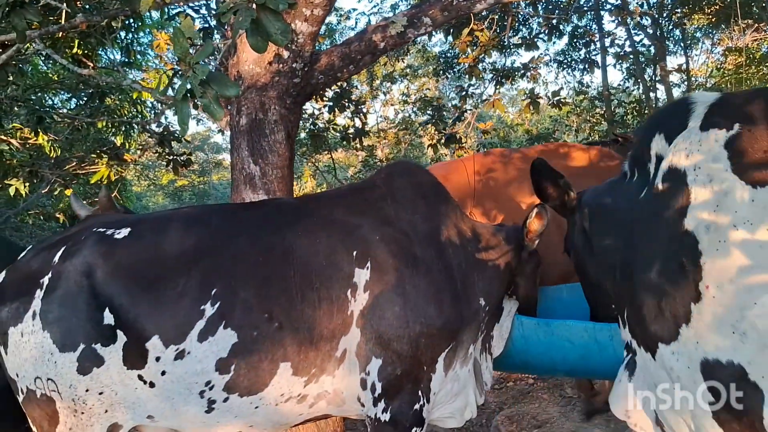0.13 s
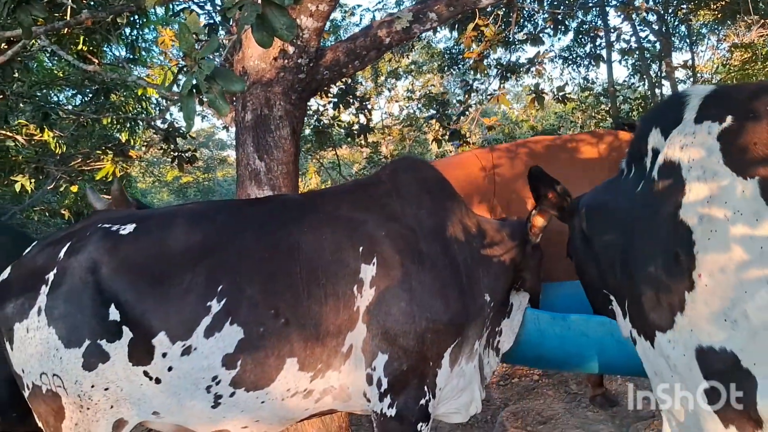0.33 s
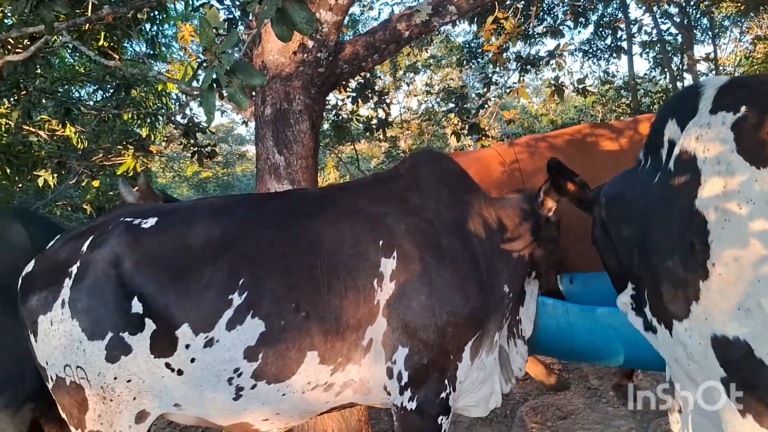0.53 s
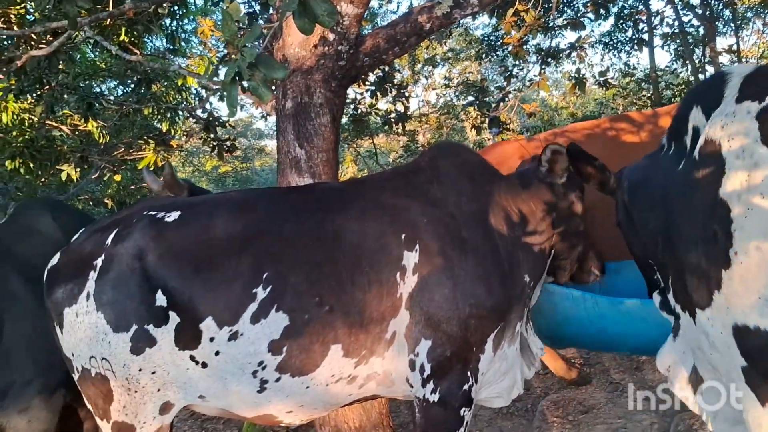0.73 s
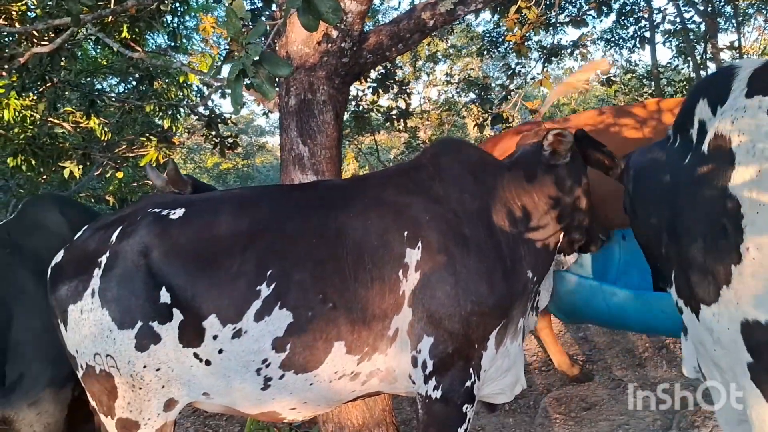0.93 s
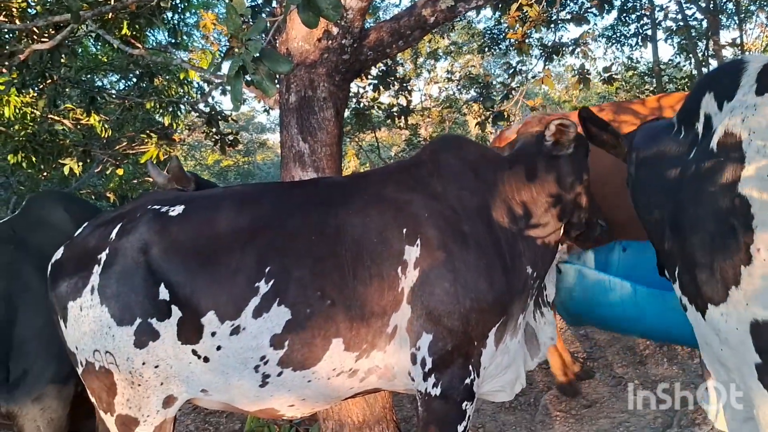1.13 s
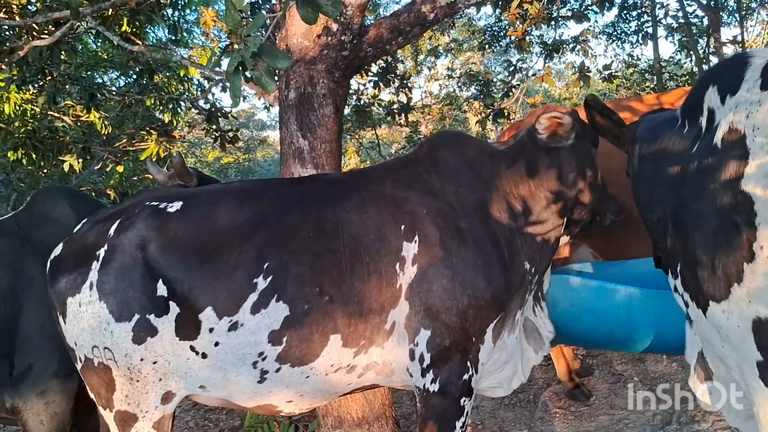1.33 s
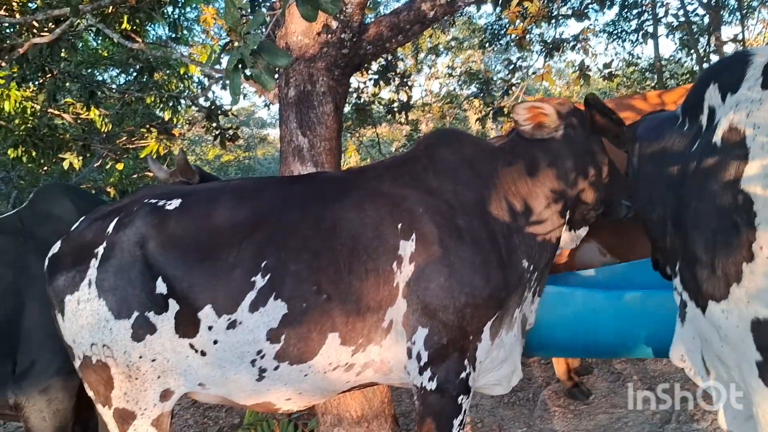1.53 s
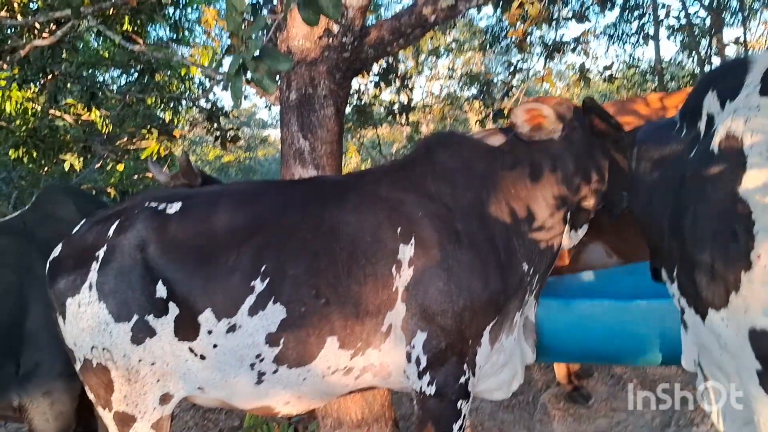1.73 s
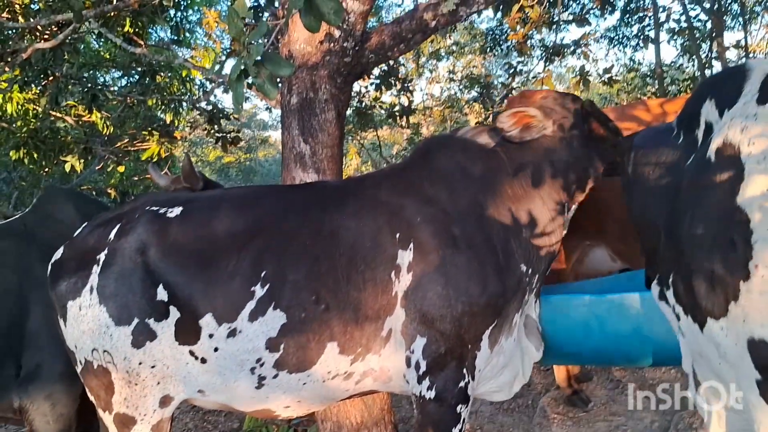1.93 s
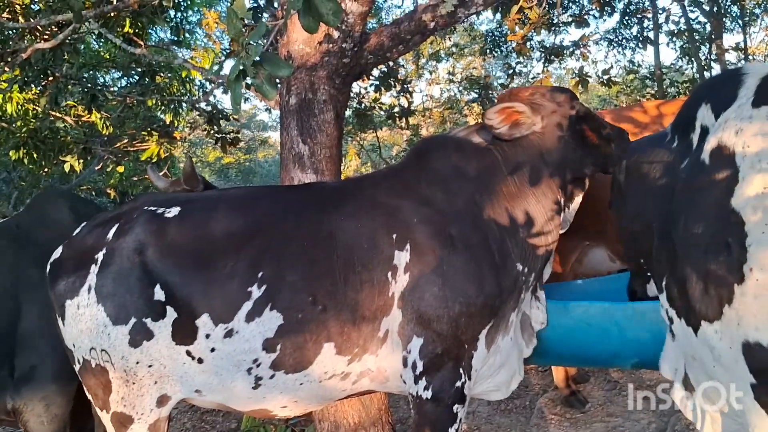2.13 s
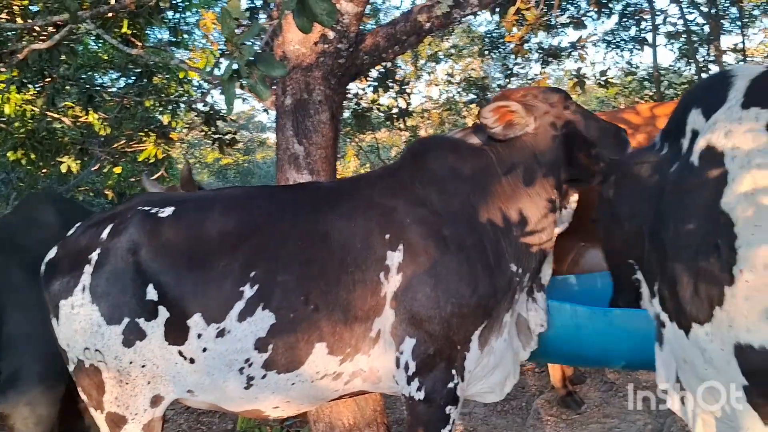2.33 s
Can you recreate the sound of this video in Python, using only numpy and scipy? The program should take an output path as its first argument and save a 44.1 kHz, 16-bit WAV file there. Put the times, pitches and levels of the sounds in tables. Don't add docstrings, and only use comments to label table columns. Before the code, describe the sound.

Cattle bump a hollow plastic trough in uneven clusters, tongues ticking and salt crunching, faint birds behind

```python
import sys
import numpy as np
from scipy import signal
from scipy.fft import rfft, irfft, next_fast_len
from scipy.io import wavfile

SR = 44100
rng = np.random.default_rng(int(sys.argv[2]) if len(sys.argv) > 2 else 0)


def to_wav(s):
    ch = np.atleast_2d(s).T
    pcm = np.round(np.clip(ch, -1, 1) * 32767)
    wavfile.write(sys.argv[1], SR, pcm.astype(np.int16))


def invert_db(x):
    u = np.asarray(x, float) / 20
    return 10 ** u


N = 103635


def at_hz(points, hz):
    point_hz, value = np.transpose(points)
    return np.interp(np.log(hz), np.log(point_hz), value)


def rms_one(x):
    return x / np.sqrt(np.mean(x ** 2) + 1e-20)


def drift(rate_hz):
    r = np.exp(-80 * np.pi * rate_hz / SR)
    noise = rng.standard_normal(N // 40 + 2002)
    slow = signal.lfilter([1], [1, -2 * r, r * r], noise)[2000:]
    return np.interp(np.arange(N) / 40, np.arange(len(slow)), rms_one(slow))


def ring(clicks, hz, t60_s):
    r = invert_db(-60 / (t60_s * SR))
    w = 2 * np.pi * hz / SR
    return signal.lfilter([0, np.sin(w)], [1, -2 * r * np.cos(w), r * r], clicks + 1e-18)


def grains(per_s, spread_db):
    sizes = invert_db(spread_db * np.minimum(rng.exponential(1, N), 4)) * rng.choice([-1, 1], N)
    return sizes * (rng.random(N) < per_s / SR)


def gritty(per_s, grain_db):
    sources = []
    for _ in range(2):
        hiss = rng.standard_normal((2, N))
        clicks = invert_db(grain_db) * rms_one(grains(per_s, spread_db=4.5))
        sources.append(hiss + clicks * rng.choice([-1, 1], (2, N)))
    return sources


def coloured(sources, spectrum, tilt, patchy_db):
    out = 0
    edges = 25 * 2 ** np.arange(0, 9.6, .5)
    for k, (low, high) in enumerate(zip(edges, edges[1:])):
        hz = np.sqrt(low * high)
        if hz > spectrum[0][0] * .7:
            bandpass = signal.butter(2, [low, high], "band", fs=SR, output="sos")
            band = signal.sosfilt(bandpass, sources[k % 2])
            level_db = at_hz(spectrum, hz) + tilt * np.log2(hz / 4000) + patchy_db * drift(14.7)
            out = out + band * invert_db(level_db)
    return out


def stroke(start_s, length_s, attack_s=0.0068):
    release_s = 0.026
    t = np.arange(N) / SR - start_s
    return np.clip(t / attack_s, 0, 1) * np.exp(-np.maximum(t - length_s, 0) / release_s)


# pitch_hz, level_db [dB], t60_s [s]
BARREL_MODES = [(101.4, -17, 0.63), (144.9, -7, 0.17), (195, -10, 0.21), (250, -6, 0.17),
                (288.7, -14.5, .15), (350, -0.5, 0.077), (431, -11, 0.19), (493.5, 1, 0.085),
                (633, -0.5, 0.048), (787, 2, 0.043), (953, 1.5, 0.021), (1070, 2, 0.013), (1540, -9, 0.054),
                (2490, -20, 0.037)]
# start_s [s], peak_db [dB], pitch_hz (favoured) [Hz], rattle_s [s]
BUMPS = [(0.053, -34.5, 960, 0.0085), (0.192, -33, 205, 0.0088), (0.279, -27.5, 1190, 0.0091),
         (0.294, -29, 1300, 0.0046), (0.313, -26, 1200, 0.0043), (.329, -19.5, 860, 0.0069),
         (0.356, -16, 380, 0.011), (0.368, -19.5, 350, 0.019), (0.51, -56.5, 1500, 0.017),
         (0.723, -31, 304, 0.01), (0.806, -30, 830, 0.011), (.848, -23, 560, 0.0075),
         (0.85, -29, 1910, 0.016), (0.97, -30, 660, 0.027), (1.044, -25.5, 1940, 0.012),
         (1.103, -16.5, 1660, 0.0051), (1.213, -29, 350, 0.018), (1.242, -33, 1520, 0.017),
         (1.293, -30, 1510, 0.0056), (1.54, -40, 2120, 0.0084), (2.003, -20.5, 430, 0.009)]


def knocks():
    out = 0
    luck = rng.standard_normal((len(BARREL_MODES), len(BUMPS)))
    for (mode_hz, mode_db, t60_s), lucks in zip(BARREL_MODES, luck):
        hits = np.zeros(N)
        rattle = grains(700, spread_db=2.64) / 2
        for (start_s, peak_db, pitch_hz, rattle_s), chance in zip(BUMPS, lucks):
            i, n = int(start_s * SR), max(int(rattle_s * SR), 2)
            push = rattle[i:i + n] * np.linspace(1, .3, n)
            push[0] = 0.24
            detuning_db = 3.5 * np.log2(mode_hz / pitch_hz) ** 2
            hits[i:i + n] += push * invert_db(peak_db + mode_db + 1.33 * chance - detuning_db)
        out = out + ring(hits, mode_hz, t60_s)
    return invert_db(-10) * out


# start_s [s], length_s [s], level_db [dB], pitch_hz (favoured) [Hz]
SHOVES = [(0.037, 0.061, -56.5, 350), (0.179, 0.091, -48, 138), (0.228, 0.064, -38, 350),
          (0.357, 0.082, -38, 192), (0.49, 0.042, -45.5, 270), (0.659, 0.17, -43.5, 320),
          (0.804, 0.12, -48, 304), (0.94, 0.12, -35, 394), (1.079, 0.14, -35.5, 253),
          (1.237, 0.065, -39, 195), (1.372, 0.254, -53.5, 305), (1.754, 0.22, -47.5, 250),
          (1.773, 0.048, -34.5, 2850), (2.007, 0.061, -38, 190), (2.108, 0.11, -53, 171)]


def drags():
    out = 0
    strokes = np.array([stroke(start_s, length_s, attack_s=0.016) for start_s, length_s, _, _ in SHOVES])
    _, _, level_db, pitch_hz = np.transpose(SHOVES)
    slips_per_s = 300 * invert_db(3.5 * drift(25))
    for mode_hz, mode_db, t60_s in BARREL_MODES:
        detuning_db = 4.9 * np.log2(mode_hz / pitch_hz) ** 2
        force = invert_db(level_db + mode_db - detuning_db) @ strokes
        slips = grains(slips_per_s, spread_db=3) * force
        out = out + ring(slips, mode_hz, t60_s * 0.42)
    soft_contact = signal.butter(1, 8100, fs=SR)
    return invert_db(-5.5) * signal.lfilter(*soft_contact, out)


# start_s [s], peak_db [dB], pitch_hz [Hz], t60_s [s]
TONGUE_TICKS = [(0.0554, -37, 1474, 0.035), (0.2417, -35, 2730, 0.027), (0.277, -29, 1550, .03),
                (.2952, -28, 1670, 0.031), (0.308, -24, 1124, 0.034), (.3296, -23, 1484, 0.044),
                (.33, -36.5, 4100, .025), (0.3594, -30, 5360, 0.009), (0.5064, -33.5, 1617, .03),
                (.508, -39.5, 2680, 0.026), (0.649, -39, 1560, 0.025), (.6789, -46, 2170, 0.041),
                (.8046, -18.5, 900, 0.029), (0.807, -36.5, 2000, 0.06), (.849, -24, 598, 0.056),
                (.851, -36, 2413, 0.066), (.9433, -37, 2170, 0.044), (.965, -20, 676, 0.041),
                (.982, -25, 691, 0.063), (1.0445, -28, 2280, 0.017), (1.055, -24, 1057, .05),
                (1.101, -25, 1700, 0.02), (1.103, -33.5, 2140, .04), (1.1586, -30.5, 1490, .02),
                (1.2139, -31, 2490, 0.019), (1.2386, -31.5, 1497, 0.057), (1.301, -27, 1500, 0.02),
                (1.467, -37, 3010, .02), (1.5165, -38, 2330, 0.015), (1.544, -34.5, 2090, 0.014),
                (1.5527, -33, 2420, .02), (.361, -30, 1576, 0.08), (1.6212, -40, 2120, 0.018),
                (1.7898, -43, 2160, 0.017), (1.8163, -30, 2600, .008), (1.951, -40.5, 2300, 0.019),
                (2.004, -35.5, 4460, 0.011), (2.0025, -26, 761, 0.061)]


def ticks():
    out = np.zeros(N + SR // 4)
    for start_s, peak_db, pitch_hz, t60_s in TONGUE_TICKS:
        i = int(start_s * SR)
        push = np.zeros(SR // 8)
        push[[0, int(2.3 * SR / pitch_hz)]] = 1, .6
        out[i:i + len(push)] += invert_db(peak_db - 5.5) * ring(push, pitch_hz, max(t60_s, .004))
    return out[:N]


# start_s [s], length_s [s], level_db [dB], pitch_hz [Hz], t60_s [s]
RIM_RASPS = [
    (1.776, .055, -47, 2170, .009),
    (1.83, .04, -51, 1800, .005),
    (1.59, .03, -57, 2050, .01),
]


def rasp():
    out = 0
    for start_s, length_s, level_db, pitch_hz, t60_s in RIM_RASPS:
        lower = ring(grains(800, spread_db=3.3), pitch_hz, t60_s)
        upper = ring(grains(800, spread_db=3.1), pitch_hz * 1.1, t60_s)
        out = out + invert_db(level_db) * stroke(start_s, length_s) * rms_one(lower + upper)
    return out


# pitch_hz [Hz], level_db [dB per Hz]
LITTER_SPECTRUM = [(700, -11), (1300, -7.5), (2300, -6.5), (3500, -10.5), (7000, -11.5), (9200, -24),
                   (12000, -16), (16000, -17)]
# start_s [s], length_s [s], level_db [dB], brightness [dB per octave]
SCUFF_STROKES = [(0.05, 0.16, -59.5, -1.5), (0.231, 0.039, -49.5, -2), (0.289, 0.11, -49, 2.2),
                 (0.412, 0.11, -51, -1.5), (0.502, 0.056, -50, -1.1), (0.675, 0.051, -44, 0),
                 (0.791, 0.084, -49, -0.5), (0.915, 0.1, -43.5, -0.3), (1.028, 0.044, -40, -0.5),
                 (1.095, 0.043, -44, 0.1), (1.152, 0.17, -46, -1.9), (1.278, 0.011, -56.5, 11),
                 (1.392, 0.15, -53, -1), (1.542, 0.1, -50.5, 0.4), (1.765, 0.097, -43, 1),
                 (1.882, 0.086, -55, -1), (2.015, 0.066, -56, -1.5), (2.165, 0.058, -57.5, 1.5)]


def scuff():
    levels = np.array([invert_db(db) * stroke(start_s, length_s) for start_s, length_s, db, _ in SCUFF_STROKES])
    force = levels.sum(axis=0)
    tilt = np.array(SCUFF_STROKES)[:, -1] @ levels / (force + 1e-9)
    raw = gritty(1200 * invert_db(3.6 * drift(25)), grain_db=0)
    litter = rms_one(coloured(raw, LITTER_SPECTRUM, tilt, patchy_db=3.5))
    return force * invert_db(1.1 * drift(67)) * litter


# start_s [s], peak_db [dB], brightness [dB per octave], t60_s (crackle) [s]
FRACTURES = [(0.125, -31, 6.5, 0.043), (.2, -33.5, 2.5, 0.064), (0.2393, -27, 1, 0.11),
             (0.3287, -19, -2.5, 0.0059), (0.3599, -28, 4.5, 0.018), (0.662, -34, 2, 0.027),
             (0.805, -29, 3, 0.025), (0.8515, -29.5, -6, 0.044), (.94, -45, 9.5, .04),
             (1.045, -27.5, 8, 0.056), (1.099, -32.5, 7, 0.048), (1.16, -37, 5, .025),
             (1.215, -32, 4, 0.0083), (1.3, -25, -0.5, 0.011), (1.338, -44, 6, .02),
             (1.545, -33, -1, 0.016), (1.5526, -26.5, 0.5, 0.029), (1.594, -35.5, 4, 0.12),
             (1.756, -39.5, 2.5, 0.057), (1.8143, -25, -1, .006), (1.873, -35.5, -1, .025),
             (2.003, -32.5, -5.5, 0.066), (2.104, -40, 0.5, 0.04), (2.156, -34.5, 2, 0.094)]


def snaps():
    drive, tilt = np.zeros(N), np.zeros(N)
    t = np.arange(N) / SR
    for start_s, peak_db, brightness, t60_s in FRACTURES:
        after = np.maximum(t - start_s, 0)
        crackle = invert_db(-60 * after / max(t60_s, .005))
        crack = invert_db(-60 * after / 0.0038)
        drive += (t >= start_s) * invert_db(peak_db) * (crackle + crack)
        tilt[t >= start_s - .002] = brightness
    raw = [drive * x for x in gritty(2400, grain_db=5.5)]
    return invert_db(-2) * coloured(raw, LITTER_SPECTRUM, tilt, patchy_db=0)


# start_s [s], length_s [s], start_hz [Hz], end_hz [Hz], level_db [dB]
FAR_CHIRPS = [(.012, .02, 3050, 3000, -56), (.066, .022, 4400, 4380, -59), (.092, .012, 4700, 4500, -58),
              (.1, .018, 3080, 3000, -55), (.12, .02, 3050, 3020, -54), (.168, .022, 4650, 4480, -57),
              (.184, .02, 3050, 3050, -56), (.213, .018, 3020, 3060, -56), (.345, .035, 2750, 2600, -51),
              (.42, .055, 2850, 2700, -55), (.538, .035, 3000, 3200, -55), (.885, .028, 3250, 3000, -54),
              (.9, .022, 4550, 4400, -55), (.92, .022, 4600, 4650, -51), (.935, .04, 3050, 2950, -47),
              (.972, .022, 4450, 4400, -49), (1.165, .025, 4200, 4100, -49), (1.4, .022, 2900, 3000, -52),
              (1.455, .025, 3100, 3050, -58), (1.975, .03, 3000, 2950, -59), (2.02, .078, 2950, 3150, -58),
              (2.13, .035, 2900, 3500, -55), (2.158, .06, 2600, 2800, -55), (2.305, .03, 2950, 2650, -54)]


def birds():
    out, wobble = np.zeros(N), drift(103)
    for start_s, length_s, start_hz, end_hz, level_db in FAR_CHIRPS:
        i, n = int(start_s * SR), int(length_s * SR)
        hz = np.linspace(start_hz, end_hz, n) * (1 + .011 * wobble[i:i + n])
        flutter_db = 2.5 * wobble[::-1][i:i + n]
        swell = np.sin(np.pi * np.arange(n) / n) ** .5
        out[i:i + n] += invert_db(level_db + flutter_db) * swell * np.sin(2 * np.pi * np.cumsum(hz) / SR)
    return out


# pitch_hz [Hz], level_db [dB per Hz]
AIR_SPECTRUM = [(15, -48), (25, -15), (102, -3.5), (354, 5), (695, -6.5), (4000, -1.5), (9070, -21.5),
                (14000, -4), (16000, -47)]


def pasture_air():
    noise = rng.standard_normal((2, 2, N))
    return invert_db(-55.5) * rms_one(coloured(noise, AIR_SPECTRUM, 0, patchy_db=3.5))


# pitch_hz [Hz], share [0 to 1]
COHERENCE = [(60, 0.77), (300, 0.94), (700, 0.48), (2000, 0.48), (12000, 0.53)]


def spaced(shared, unshared):
    size = next_fast_len(N + SR // 2)
    hz = np.maximum(np.fft.rfftfreq(size, 1 / SR), 1)
    t = np.arange(SR // 4) / SR
    alike = np.clip(at_hz(COHERENCE, hz), 0, 1)
    unlike = np.sqrt(1 - alike)
    echo_t60_s, right_lag_s = 0.096, 0.0005916
    echo = rng.standard_normal((2, len(t))) * invert_db(-60 * t / echo_t60_s) * (t > .003)
    scatter = invert_db(-5) * unlike * rfft(rms_one(echo) / np.sqrt(len(t)), size)
    delay_s = right_lag_s * np.array([[0], [1]])
    lag = np.exp(-2j * np.pi * np.maximum(hz - 588, 0) * delay_s)
    left_db = 2 * np.tanh(np.log2(hz / 4000)) * (hz > 700)
    lag = lag * invert_db(left_db * np.array([[.5], [-.5]]))
    path = np.sqrt(alike) * lag + scatter
    opposed = rfft(unshared, size) * lag * unlike * [[1], [-1]]
    return irfft(rfft(shared, size) * path + opposed, size)[:, :N]


def scene():
    shared, unshared = scuff() + snaps() + pasture_air()
    trough = knocks() + drags() + ticks() + rasp()
    rim = signal.sosfilt(signal.butter(2, 900, "high", fs=SR, output="sos"), trough)
    return spaced(trough + shared, unshared) + invert_db(-4) * rim + birds() * invert_db([[-4], [-2]])


def roll_off(x):
    return signal.sosfilt(signal.butter(12, 16820, fs=SR, output="sos"), x)


def record(dry):
    treble_cut = signal.cheby2(16, 30, 16000, fs=SR, output="sos")
    bass_cut = signal.butter(3, 55, "high", fs=SR, output="sos")
    mix = signal.sosfilt(bass_cut, signal.sosfilt(treble_cut, dry))
    return roll_off(mix)


dry = scene()
out = record(dry)
to_wav(out)
```